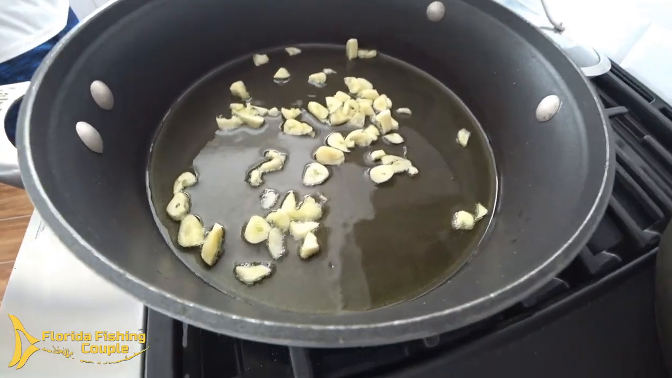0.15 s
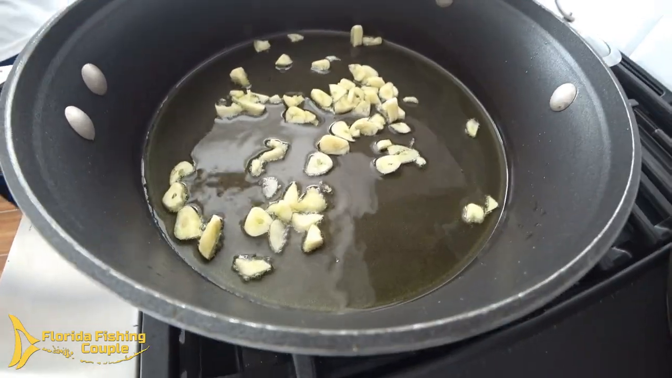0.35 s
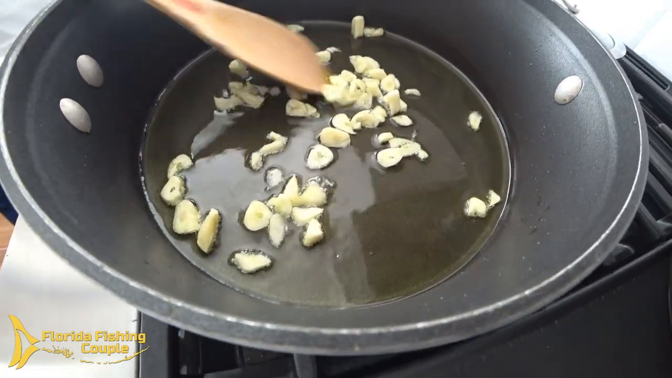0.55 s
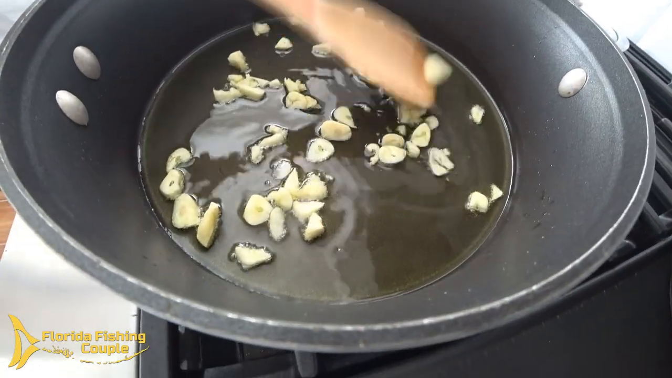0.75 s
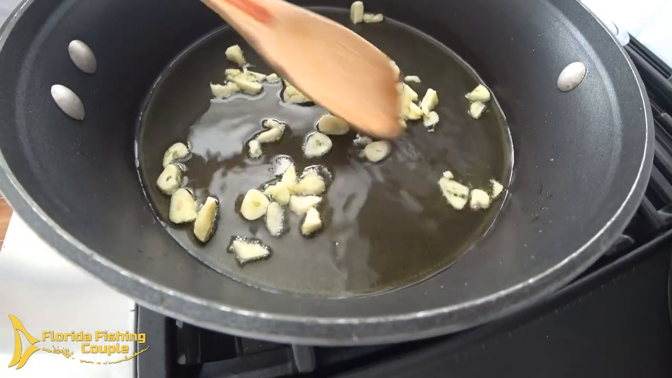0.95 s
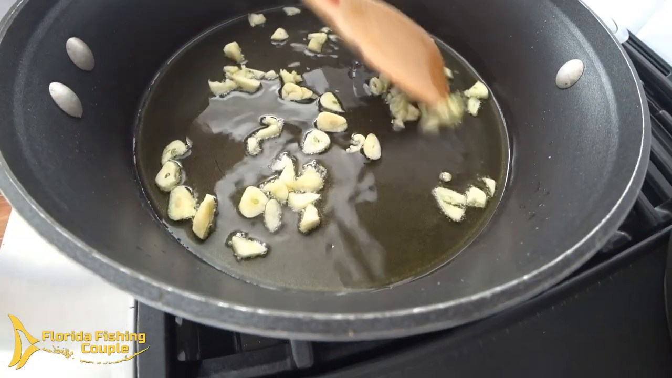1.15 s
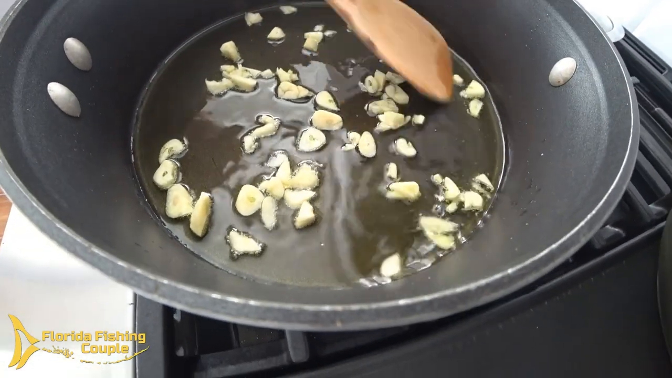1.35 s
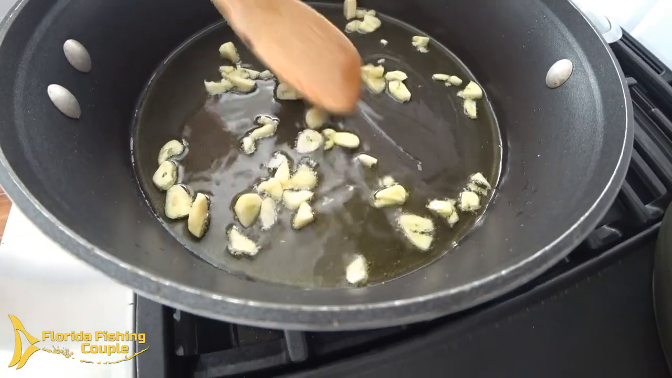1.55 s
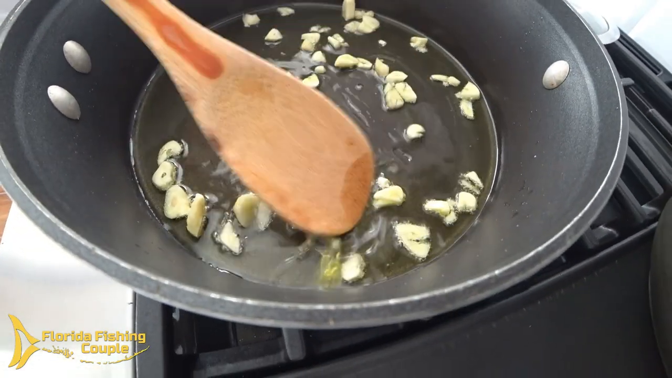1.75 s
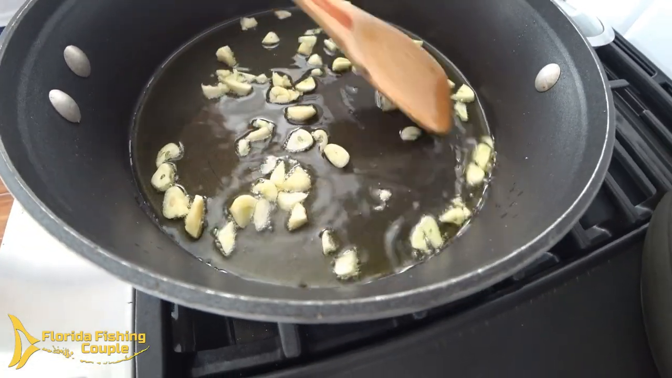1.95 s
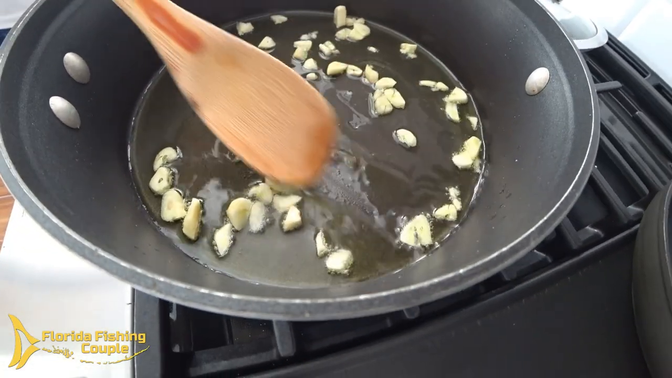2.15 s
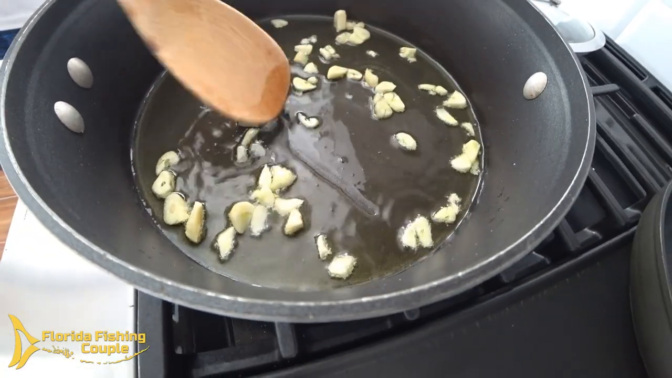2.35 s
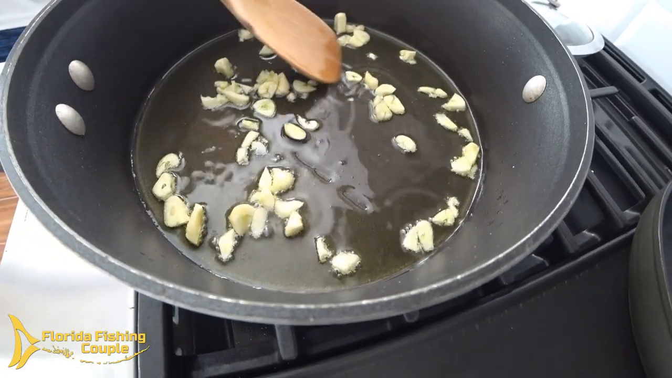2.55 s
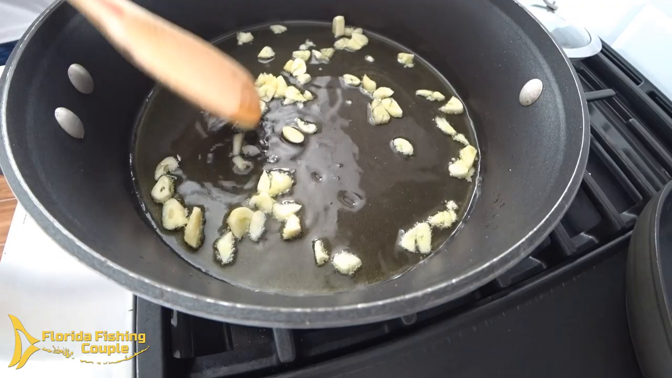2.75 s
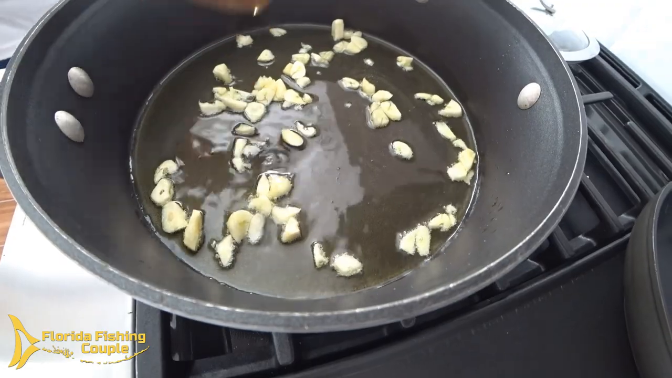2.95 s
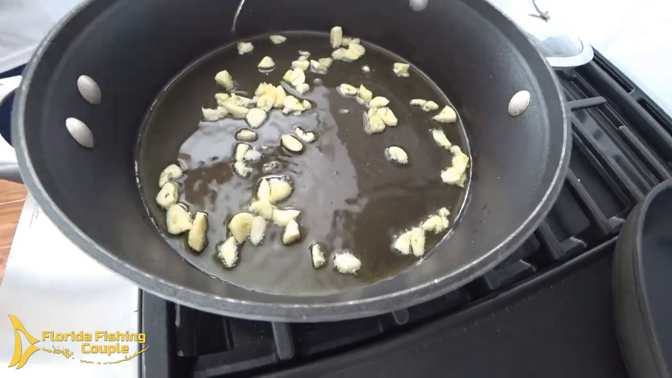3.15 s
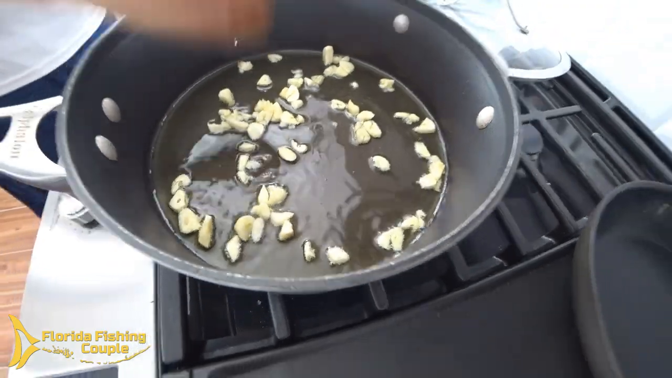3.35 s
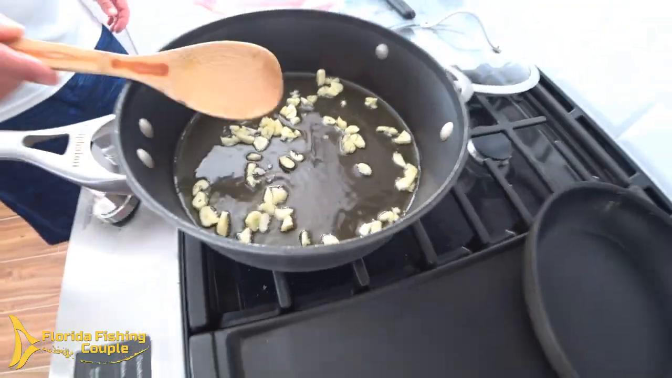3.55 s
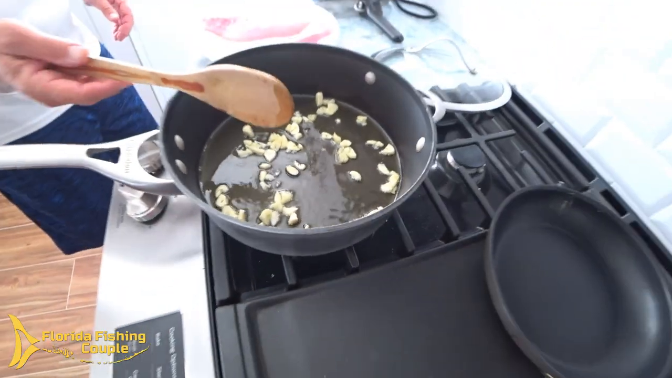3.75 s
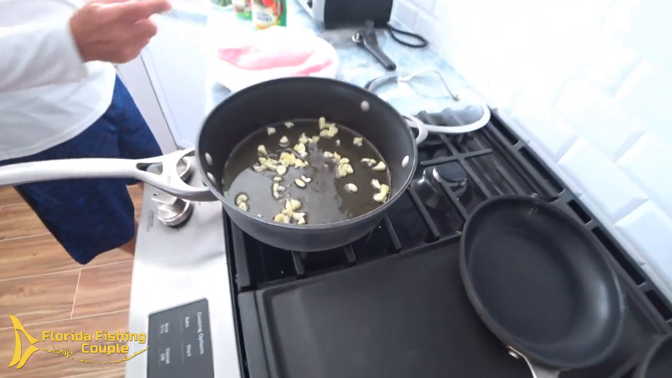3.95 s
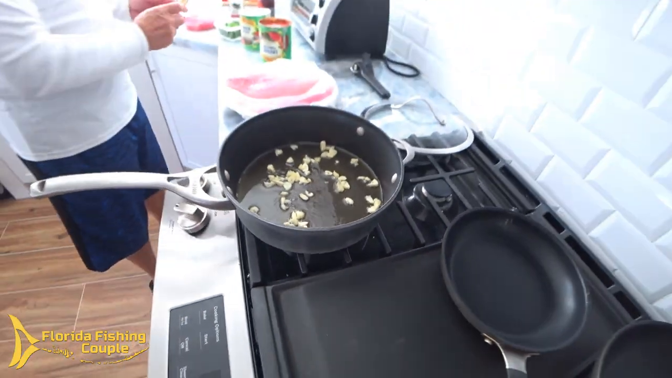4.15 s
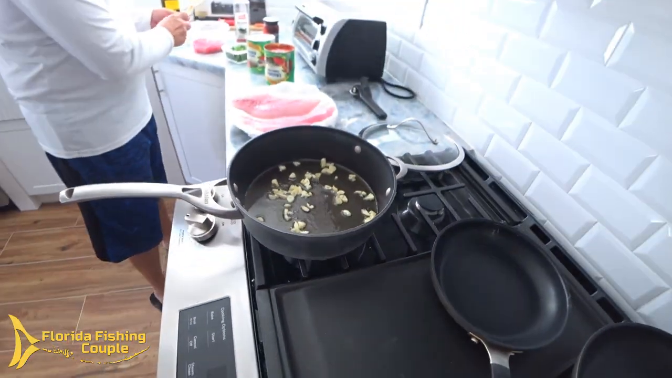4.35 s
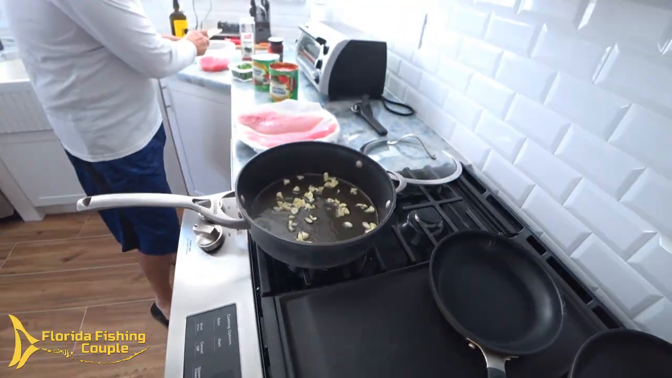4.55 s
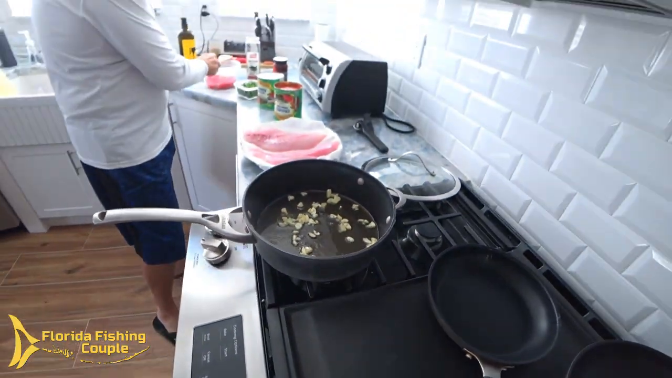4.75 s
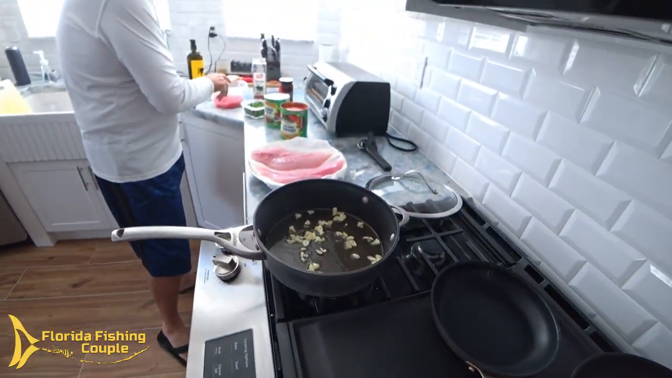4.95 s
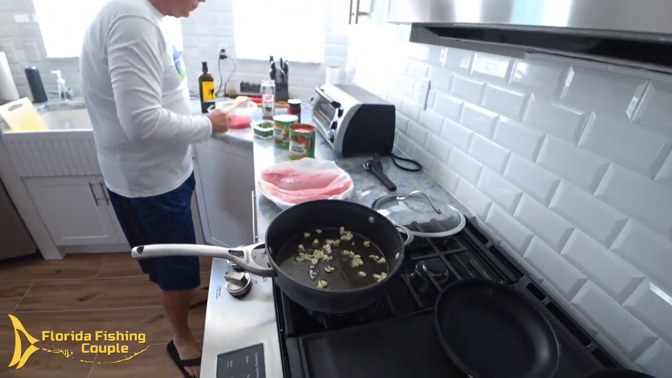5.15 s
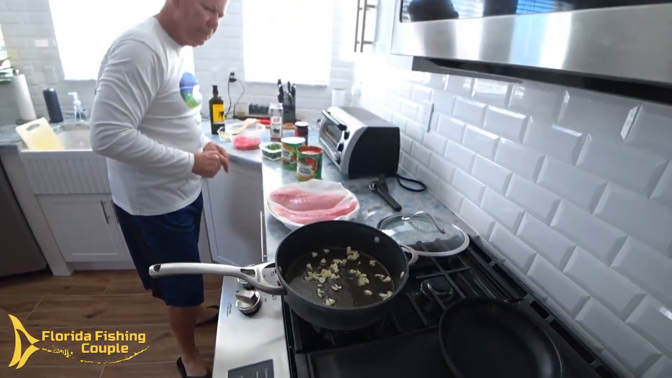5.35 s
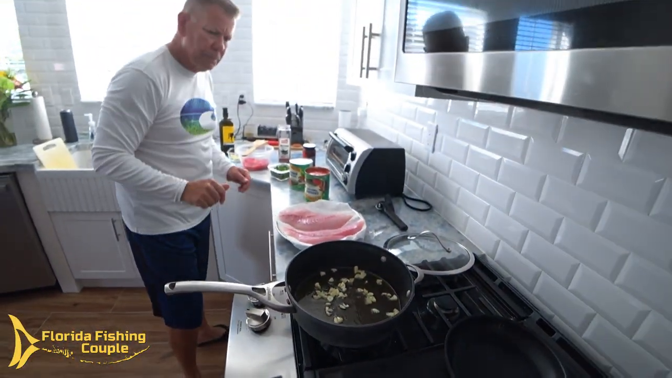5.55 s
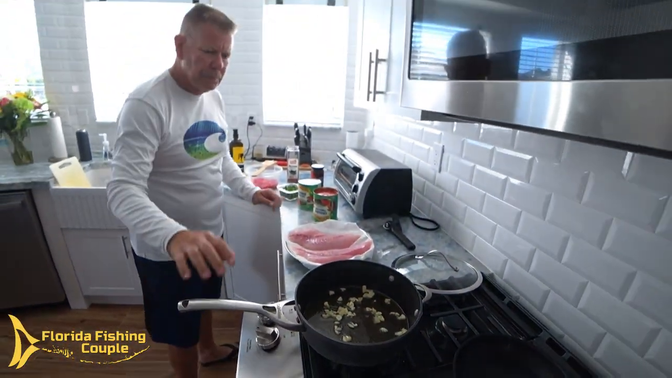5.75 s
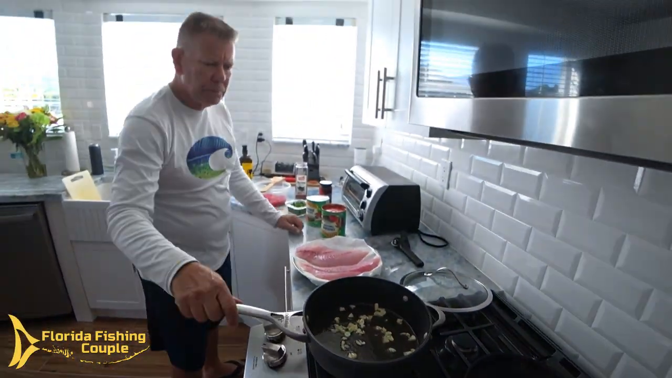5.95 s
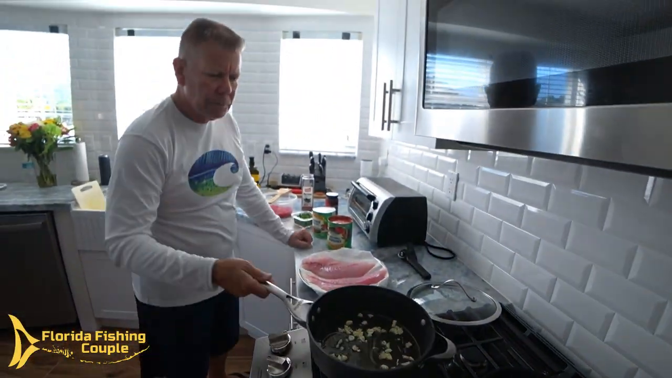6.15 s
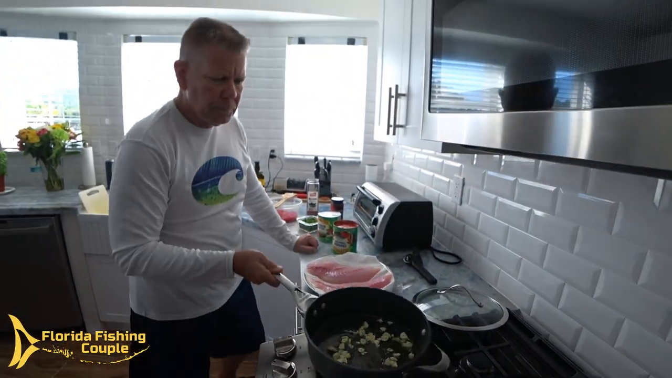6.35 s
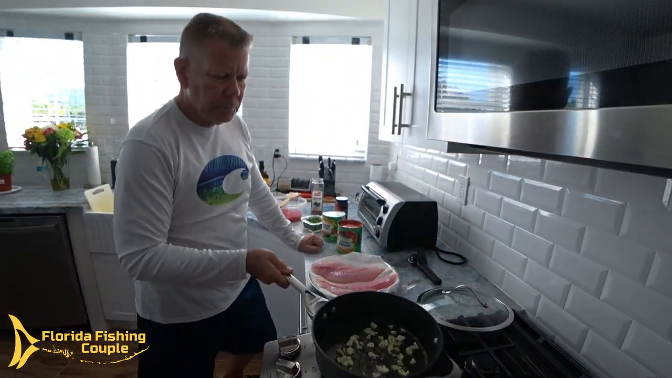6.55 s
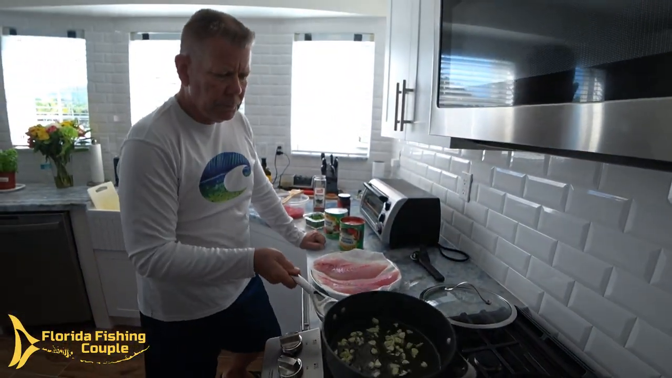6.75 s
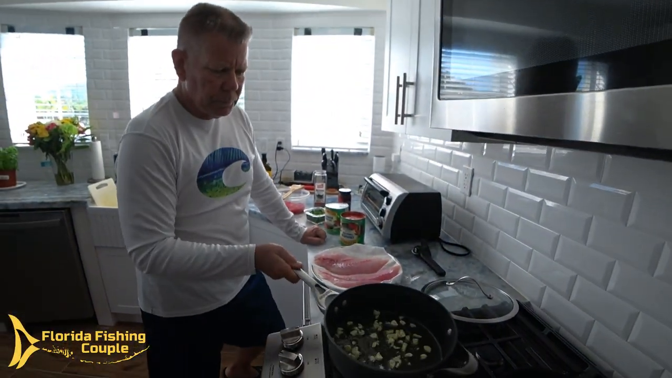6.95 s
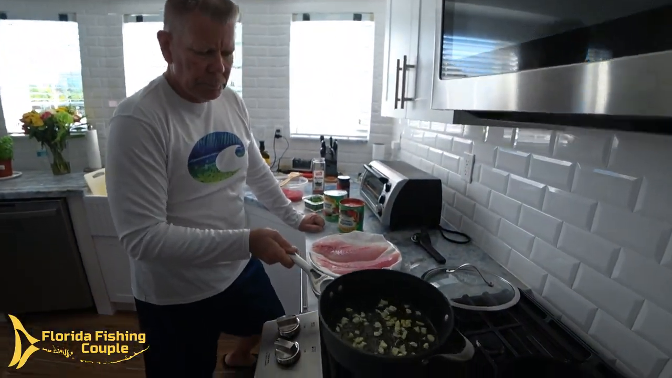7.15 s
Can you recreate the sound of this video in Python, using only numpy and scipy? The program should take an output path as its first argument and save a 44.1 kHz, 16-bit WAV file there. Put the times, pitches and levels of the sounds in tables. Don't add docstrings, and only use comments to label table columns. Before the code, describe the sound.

Soft oil fizz and tiny pops, wooden spoon knocks and swishes in a pan, a hard clack on the counter, then rough pan shaking.

```python
import sys
import numpy as np
from scipy import signal
from scipy.fft import rfft, irfft, next_fast_len
from scipy.io import wavfile
from scipy.ndimage import map_coordinates

SR = 44100
rng = np.random.default_rng(int(sys.argv[2]) if len(sys.argv) > 2 else 0)


def master(y):
    cut = np.clip(np.atleast_2d(y).T, -1, 1)
    pcm = np.round(cut * 32767)
    wavfile.write(sys.argv[1], SR, pcm.astype(np.int16))


def gain_from_decibels(decibels):
    exponent = np.asarray(decibels, float) / 20
    return 10 ** exponent


N = 317079
T = np.arange(N) / SR

# f/Hz, width/Hz, level/dB
PAN_RIM_MODES = [(312.7, 6.1, -24), (674.3, 42, -0.5), (1204, 123, -3), (1974, 69, -5), (2300, 83, -14),
                 (2867, 34, -8), (3425, 27, -19), (3800, 56, -14), (4200, 61, -35), (4470, 97, -30),
                 (4840, 25, -28), (5240, 400, -15.5), (5880, 45, -21.5)]
# f/Hz, level/dB
GRIND_COLOUR = [(35, -71), (60, -41), (264, -6.5), (355, -27), (629, 3.5), (862, 2.5), (1300, -3),
                (1620, 3), (5000, -14), (6500, -47), (11000, -120)]


def unit(x):
    return x / np.sqrt(np.mean(x ** 2) + 1e-20)


def along(points, hz):
    f, value = np.transpose(points)
    return np.interp(np.log(hz + 1), np.log(f + 1), value)


def curves(rows):
    s, *columns = np.transpose(rows)
    return [np.interp(T, s, column) for column in columns]


def during(rows):
    fade_in = T - rows[0][0]
    fade_out = rows[-1][0] + 0.01 - T
    return np.clip(np.minimum(fade_in, fade_out) * 100, 0, 1)


def filtered(x, response):
    size = next_fast_len(x.shape[-1] + SR // 2)
    spectrum = rfft(x, size) * response(np.fft.rfftfreq(size, 1 / SR))
    return irfft(spectrum, size)[..., :x.shape[-1]]


def colour(spectrum):
    return lambda hz: gain_from_decibels(along(spectrum, hz))


def body(modes):
    def response(f):
        total = 0
        for k, (centre, width, db) in enumerate(modes):
            damping = 1j * f * width
            total = total + (-1) ** k * gain_from_decibels(db) * damping / (centre ** 2 - f ** 2 + damping)
        return total
    return response


def pair(size=N):
    # f/Hz, correlation
    likeness = [(30, 0.93), (125, 0.94), (400, 0.95), (1500, 0.95), (4000, 0.86), (8000, 0.81),
                (14000, 0.7)]

    def mid_side(hz):
        turn = np.arccos(np.clip(along(likeness, hz), 0, 1)) / 2
        return np.array([np.cos(turn), np.sin(turn)])

    mid, side = filtered(rng.standard_normal((2, size)), mid_side)
    return np.array([mid + side, mid - side])


def grit(rate, spread_db):
    sizes = rng.standard_normal(int(N * rate / SR) + 4)
    sizes = map_coordinates(sizes, [T * rate], order=1)
    return unit(pair() * gain_from_decibels(spread_db * sizes))


def rubbed(drive, envelope, response):
    scale = np.sqrt(np.mean(filtered(drive, response) ** 2))
    return filtered(drive * envelope, response) / scale


def push(rows):
    out = np.zeros(N)
    for s, db, ms in rows:
        n = max(3, round(ms * SR / 1000))
        force = np.sin(np.pi * np.arange(n) / n) / n
        out[round(s * SR):][:n] += gain_from_decibels(db) * force
    return out


def strokes(rows):
    low, high = np.zeros((2, N))
    for s, db, skid, t60, bright_db in rows:
        start = np.clip((T - s) / 0.00081, 0, 1)
        release_db = -60 * np.clip(T - s - skid, 0, 9) / t60
        shape = start * gain_from_decibels(db + release_db)
        low = low + shape
        high = high + gain_from_decibels(bright_db) * shape
    return low, high


def spoon():
    # t/s, peak level/dB, contact/ms, upper modes/dB
    tap_rows = [(0.201, -29, 1.1, 6), (0.599, -4.5, 1.05, -1), (0.819, -16, 2.7, -5), (0.849, -28, 1.3, 9),
                (1.095, -41, 1.2, 3), (1.416, -22, 1.4, 0), (2.479, -31, 0.99, -9), (2.585, -9, 0.93, -2),
                (2.751, -6, 0.994, -1.5), (3.069, -25.5, 1.75, 8), (3.369, -13, 1.6, 4), (3.409, -17, 1, 3),
                (3.597, -12, 1.07, 10), (5.931, -32.5, 0.97, 2)]
    # t/s, drag level/dB, slosh level/dB, slosh centre f/Hz
    stir_rows = [(0.8, -54, -55, 5640), (0.83, -47.5, -54, 5470), (0.934, -71, -64, 5850),
                 (1.056, -60, -72, 5880), (1.156, -57, -45, 7600), (1.188, -61, -45.5, 6930),
                 (1.228, -61, -43, 5030), (1.29, -70, -61.5, 4890), (1.34, -66, -58, 7490),
                 (1.404, -62, -59, 5640), (1.418, -47, -45.5, 6070), (1.508, -53.5, -55, 5770),
                 (1.558, -39.5, -43.5, 6310), (1.602, -43.5, -52.5, 6220), (1.678, -51.5, -59, 6580),
                 (1.752, -32.5, -34.5, 5830), (1.806, -64, -65.5, 6030), (1.85, -58, -57.5, 7000),
                 (1.91, -52, -45, 5300), (1.99, -51.5, -42, 6030), (2.03, -65, -53.5, 6400),
                 (2.104, -36.5, -41.5, 6600), (2.152, -63, -47.5, 6020), (2.206, -40, -42, 5900),
                 (2.42, -66, -59.5, 6020)]
    # f/Hz, width/Hz, level/dB
    pan_modes = [(636, 65, -9), (1263, 53, 0), (1452, 11, -4.5), (2026, 61, -11.5), (2564, 35, -12),
                 (4310, 70, -18.5), (5460, 91, -26)]
    # f/Hz, level/dB
    slosh_colour = [(880, -43), (1500, -25), (1920, 2.5), (2100, 5.5), (2410, -11), (2610, -2.5),
                    (10300, -2.5), (16000, -10)]

    taps = filtered(push([row[:3] for row in tap_rows]), body(PAN_RIM_MODES[:3]))
    sharp = push([(s, db + upper_db, 0.22 * ms) for s, db, ms, upper_db in tap_rows])
    upper = filtered(sharp, body(PAN_RIM_MODES[3:]))

    drag_db, slosh_db, centre = curves(stir_rows)
    stirring = during(stir_rows)
    drag_body = lambda f: body(pan_modes)(f) + 0.1 * gain_from_decibels(along(GRIND_COLOUR, f))
    drag = rubbed(grit(rate=350, spread_db=6), gain_from_decibels(drag_db) * stirring, drag_body)

    hiss = filtered(grit(rate=250, spread_db=3), colour(slosh_colour))
    hz, t, z = signal.stft(hiss, SR, nperseg=256)
    distance = np.log((hz[:, None] + 1) / np.interp(t, T, centre)) / 0.29
    bumped = z * gain_from_decibels(4.9 * np.exp(-distance ** 2))
    gain = np.sqrt(np.mean(abs(bumped) ** 2) / np.mean(abs(z) ** 2))
    slosh = signal.istft(bumped / gain, SR, nperseg=256)[1][:, :N]
    return gain_from_decibels(42) * taps + gain_from_decibels(30.5) * upper + drag + gain_from_decibels(slosh_db) * stirring * unit(slosh)


def rim():
    # t/s, level/dB, skid/s, release t60/s, brightness/dB
    skid_rows = [
        (3.09, -12, 0.039, 0.11, -1.5),
        (3.255, -13, 0.039, 0.13, -4),
        (3.422, -13, 0.037, 0.15, 0),
    ]
    # f/Hz, level/dB
    skid_colour = [(59, -56), (100, -30), (481, -13), (676, -2), (854, -25), (1250, -1), (1580, -5.5),
                   (1950, -10.5), (7940, -18), (16000, -43)]
    low, high = strokes(skid_rows)
    chatter = grit(rate=370, spread_db=6)
    ring = rubbed(chatter, low, body(PAN_RIM_MODES))
    return gain_from_decibels(-9.5) * ring + gain_from_decibels(-12.5) * rubbed(chatter, high, colour(skid_colour))


def counter():
    # t/s, peak level/dB, contact/ms
    clacks = [
        (4.705, -5.5, 0.67),
        (4.87, -23, 0.87),
    ]
    # f/Hz, width/Hz, level/dB
    wood_modes = [(694, 89, -5.5), (1450, 133, 0), (2140, 54, 2), (2600, 61, -1), (3250, 120, -19),
                  (3570, 130, -22), (4300, 51, -21), (4700, 52, -20), (5940, 45, -28)]
    return gain_from_decibels(41) * filtered(push(clacks), body(wood_modes))


def shake():
    # t/s, grind level/dB, rasp level/dB
    shake_rows = [(5.97, -54, -69), (5.982, -25, -49), (6.01, -33, -46.5), (6.218, -46, -40),
                  (6.274, -19.5, -26), (6.32, -37, -49), (6.36, -33, -31), (6.408, -22, -33.5),
                  (6.478, -39, -34.5), (6.53, -22, -34), (6.58, -34.5, -47), (6.59, -25.5, -36),
                  (6.726, -42.5, -41), (6.794, -32, -38), (6.836, -44.5, -57), (6.906, -34.5, -37.5),
                  (6.964, -42, -57), (6.996, -35, -35.5), (7.19, -41, -59)]
    # t/s, level/dB, skid/s, release t60/s, brightness/dB
    jolt_rows = [(5.981, -28.5, 0.0083, 0.063, 0), (6.257, -30, 0.0076, 0.064, 0),
                 (6.386, -9, 0.011, 0.085, 0), (6.514, -20.5, 0.0088, 0.089, 0),
                 (6.59, -15, 0.01, 0.084, 0), (6.638, -17.5, 0.0075, 0.062, 0),
                 (6.999, -29.5, 0.0085, 0.13, 0), (7.089, -28, 0.01, 0.11, 0)]
    # f/Hz, width/Hz, level/dB
    grate_modes = [(264, 26, -11), (617, 59, 5.5), (1297, 76, 3), (1934, 82, 2), (2207, 51, -5),
                   (3170, 19, -12), (3490, 150, -22), (3950, 23, -5), (4550, 55, -28), (4890, 34, -22),
                   (5420, 57, -14.5), (5990, 33, -20), (6890, 88, -24)]
    # f/Hz, level/dB
    rasp_colour = [(1470, -38), (2500, -5.5), (3080, -1.5), (4270, -10.5), (5480, -8), (6250, -11),
                   (6970, -5), (14900, -35.5), (16000, -46)]

    grind_db, rasp_db = curves(shake_rows)
    shaking = during(shake_rows)
    low, high = strokes(jolt_rows)
    iron = grit(rate=580, spread_db=1.5)
    grind_body = lambda f: body(grate_modes)(f) + 0.23 * gain_from_decibels(along(GRIND_COLOUR, f))
    grind = rubbed(iron, gain_from_decibels(grind_db - 3.0) * shaking + gain_from_decibels(-18) * low, grind_body)
    rasp = rubbed(iron, gain_from_decibels(rasp_db - 2.5) * shaking + gain_from_decibels(-21.5) * high, colour(rasp_colour))
    return grind + rasp


def pops():
    # t/s, peak level/dB, pitch f/Hz, t60/s, snap level/dB
    bursts = [(0.201, -27.5, 3950, 0.021, -1), (0.259, -33.5, 6800, 0.019, -21),
              (0.4294, -43, 5420, 0.012, -12), (0.456, -33, 3350, 0.012, -26),
              (0.4773, -30.5, 5330, 0.014, -18), (0.571, -37, 4770, 0.011, -8),
              (0.6277, -31.5, 4680, 0.018, -1), (1.266, -24.5, 4600, 0.012, -14),
              (1.3444, -32, 10100, 0.011, -12), (1.719, -29, 6830, 0.014, -14),
              (1.7325, -25, 4310, 0.013, -15), (1.8645, -35, 10200, 0.013, -16),
              (2.0338, -33, 10600, 0.012, -11), (2.1174, -30, 6850, 0.009, -14),
              (2.1595, -30, 4860, 0.011, -11), (2.2797, -29, 11500, 0.011, -10),
              (2.2972, -26, 5130, 0.0078, -9), (2.39, -37, 8690, 0.012, -8),
              (2.4833, -30.5, 7260, 0.019, -15), (2.5346, -25, 7300, 0.013, -23),
              (2.5588, -26, 6430, 0.014, -21), (2.5812, -24, 7300, 0.021, 2),
              (2.5849, -14.5, 4400, 0.0082, -26), (2.657, -27, 7400, 0.026, -13),
              (2.7146, -27, 9930, 0.013, -12), (2.7498, -23.5, 9550, 0.011, -1),
              (2.7977, -27, 6930, 0.014, -15), (2.808, -25, 8260, 0.014, -14),
              (2.8794, -32.5, 9700, 0.011, 1), (2.9846, -39, 7700, 0.012, -7),
              (3.02, -27, 7760, 0.0087, -16), (3.387, -32, 3060, 0.013, -7),
              (3.7668, -30.5, 6540, 0.022, -22), (3.839, -37.5, 7900, 0.01, -9),
              (4.0058, -34.5, 10900, 0.0094, -3), (4.2093, -46, 8400, 0.012, -8),
              (4.2193, -35.5, 10300, 0.011, -12), (4.6092, -43.5, 3170, 0.012, -6),
              (4.626, -38, 7540, 0.013, -8), (4.6353, -35.5, 5800, 0.014, -14),
              (4.7938, -32.5, 6760, 0.015, -16), (4.816, -35, 7190, 0.014, -19),
              (5.003, -44, 7700, 0.013, -11), (5.0344, -42, 8100, 0.014, -9),
              (5.0577, -41, 8100, 0.012, -15), (5.0759, -34, 5780, 0.019, -15),
              (5.147, -46, 6020, 0.012, -1), (5.275, -34.5, 5320, 0.011, -13),
              (5.4755, -39, 5440, 0.012, -8), (5.496, -34.5, 7960, 0.013, -23),
              (5.7278, -38.5, 6450, 0.019, -19), (5.842, -38.5, 7960, 0.012, -17)]
    out = np.zeros((2, N + SR))
    t = np.arange(2048) / SR
    for s, db, hz, t60, snap_db in bursts:
        wander = np.cumsum(rng.standard_normal((3, len(t))), axis=1) * 0.3
        tone = np.sin(2 * np.pi * hz * t + wander[0] + 0.26 * wander[1:])
        ring = tone * gain_from_decibels(-60 * t / t60) * (1 - np.exp(-t / 0.00026))
        snap = gain_from_decibels(snap_db - 60 * t / 0.01) * np.diff(rng.standard_normal(len(t) + 1))
        out[:, round(s * SR):][:, :len(t)] += gain_from_decibels(db + 1.0) * (ring + snap)
    return out[:, :N]


def oil():
    # t/s, sizzle level/dB, kitchen hum level/dB
    level_rows = [(0.0, -55, -59.5), (0.38, -52, -55.5), (1.46, -47.5, -59), (1.6, -51, -56),
                  (1.86, -48.5, -55.5), (2.14, -47.5, -53), (2.32, -50, -61.5), (2.56, -51, -54),
                  (2.7, -48, -52), (2.92, -50.5, -59.5), (3.14, -45.5, -55), (3.26, -49, -34.5),
                  (3.34, -47, -38.5), (3.5, -47, -43.5), (3.64, -53, -44.5), (3.8, -54, -57.5),
                  (4.5, -57, -61), (4.81, -54, -57.5), (5.67, -60.5, -60.5), (6.01, -59, -57.5),
                  (6.17, -50, -51), (6.29, -53, -41), (6.45, -55, -33.5), (6.75, -47.5, -48),
                  (7.19, -46.5, -53.5)]
    # f/Hz, level/dB
    fizz_colour = [(1180, -35.5), (2000, -5), (2460, -4), (2550, -3.5), (2760, -4.5), (4080, -3.5),
                   (5390, -0.5), (9920, -4), (16000, -15)]
    # f/Hz, level/dB
    hum_colour = [(15, -69), (25, -42), (76, -20), (320, -13), (382, -12.5), (427, -6), (477, -8.5),
                  (1010, -7), (1080, -4.5), (1380, -5.5), (5000, -22), (6500, -46), (11000, -120)]
    fizz_db, hum_db = curves(level_rows)
    fizz = 0.69 * grit(rate=40, spread_db=2.6) + 0.52 * grit(rate=700, spread_db=7)
    fizz = unit(filtered(fizz, colour(fizz_colour)))
    hum = unit(filtered(grit(rate=5.9, spread_db=0.6), colour(hum_colour)))
    return gain_from_decibels(fizz_db - 0.3) * fizz + gain_from_decibels(hum_db - 0.77) * hum


def kitchen(x, wet_db):
    # f/Hz, t60/s
    decay = [
        (200, 0.4),
        (1000, 0.41),
        (4000, 0.21),
        (12000, 0.26),
    ]
    hz, t, z = signal.stft(pair(size=SR // 2), SR, nperseg=256)
    tail = signal.istft(z * gain_from_decibels(-60 * t / along(decay, hz)[:, None]), SR, nperseg=256)[1]
    late = np.pad(tail / np.linalg.norm(tail[0]), ((0, 0), (150, 0)))
    x = x * np.ones((2, 1))
    return x + gain_from_decibels(wet_db) * signal.fftconvolve(x, late, axes=1)[:, :N]


def scene():
    stirring = kitchen(spoon(), wet_db=-9) + kitchen(rim(), wet_db=-6.5) + kitchen(counter(), wet_db=-3)
    return stirring + kitchen(shake(), wet_db=-7) + kitchen(pops(), wet_db=-9.5) + oil()


def top_cut(x):
    return signal.sosfilt(signal.butter(12, 16820, fs=SR, output="sos"), x)


def record(dry):
    # f/Hz, lead/rad
    lead = [(60, 0.46), (130, 0.8), (290, 1.98), (600, 2.485), (1800, 2.52), (4300, 1.96), (7800, 1.27),
            (11800, 0.91), (15000, .2)]
    # f/Hz, level/dB
    lean = [(60, -1.5), (180, -4), (550, -2), (1650, -1.0), (4970, -2.0), (15000, -4.5)]

    def ports(hz):
        phase = np.clip(along(lead, hz), 0, 2.8)
        half = gain_from_decibels(along(lean, hz) / 2) * np.exp(0.5j * phase)
        return np.array([half, 1 / half]) * 2 / abs(half + 1 / half)

    return top_cut(filtered(dry, ports))


dry = scene()
out = record(dry)
master(out)
```